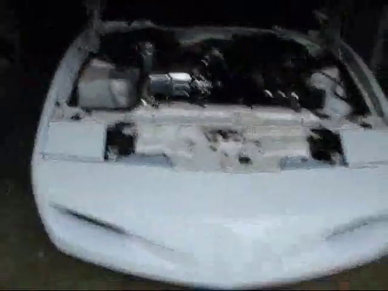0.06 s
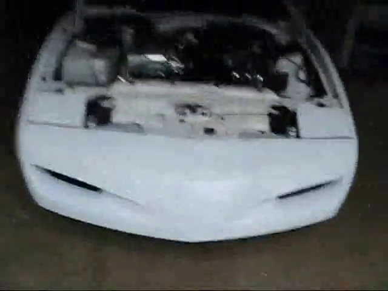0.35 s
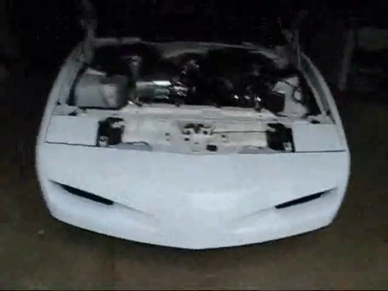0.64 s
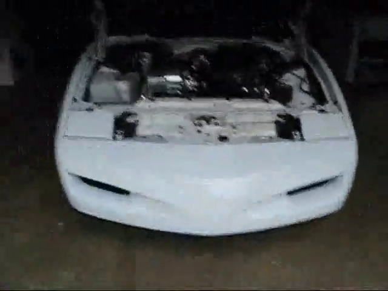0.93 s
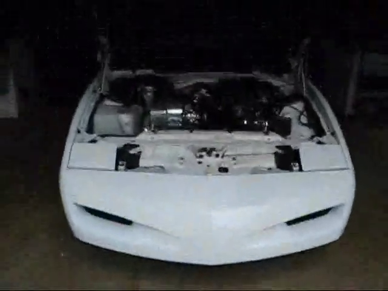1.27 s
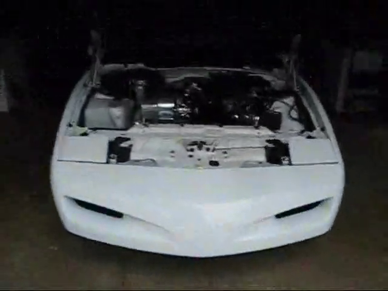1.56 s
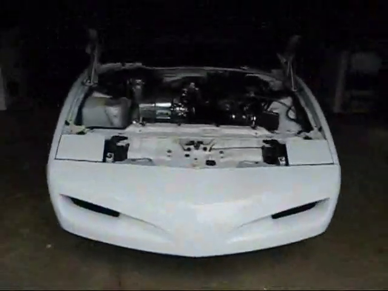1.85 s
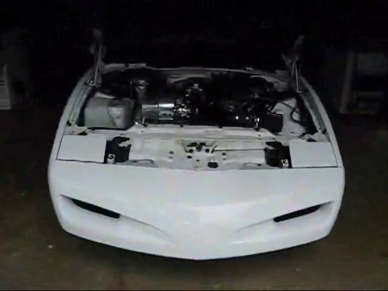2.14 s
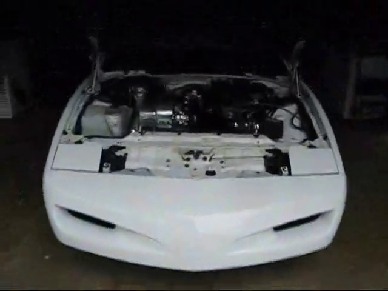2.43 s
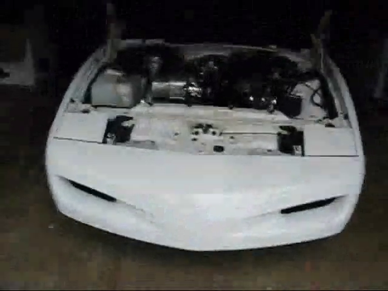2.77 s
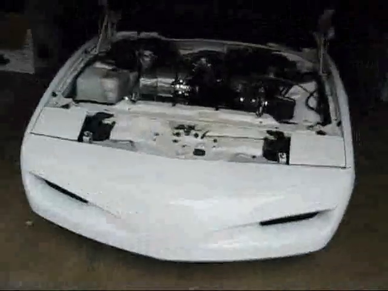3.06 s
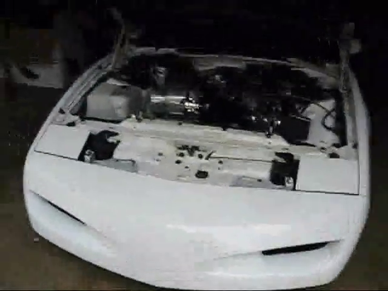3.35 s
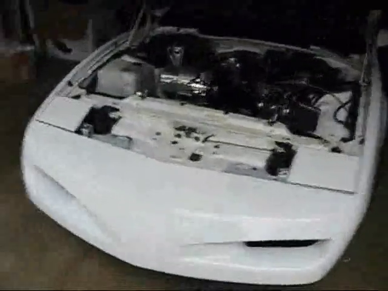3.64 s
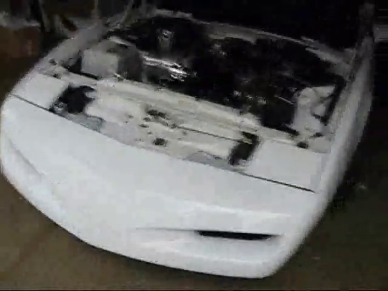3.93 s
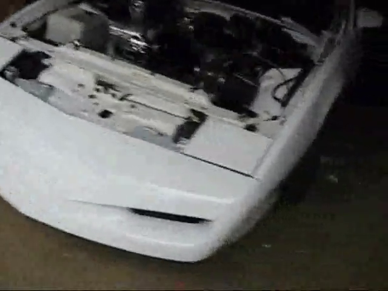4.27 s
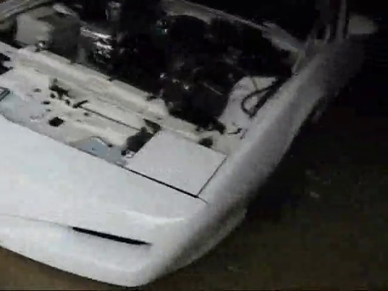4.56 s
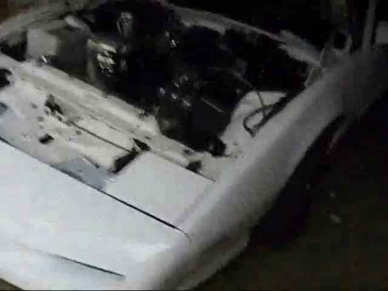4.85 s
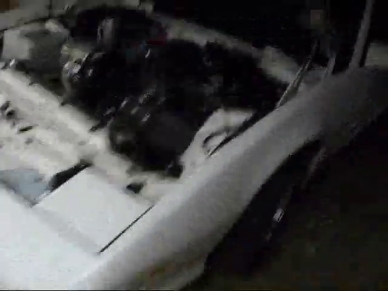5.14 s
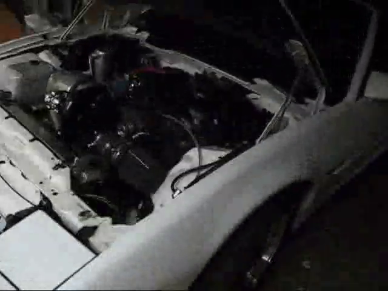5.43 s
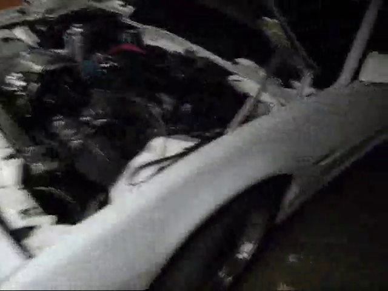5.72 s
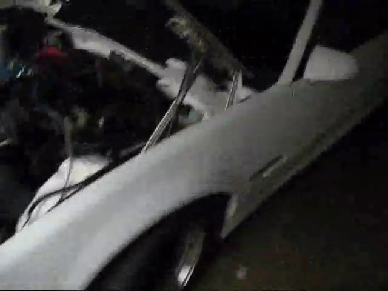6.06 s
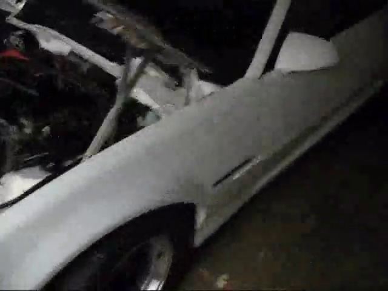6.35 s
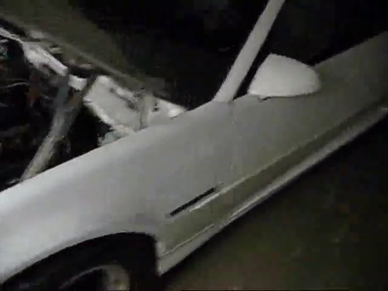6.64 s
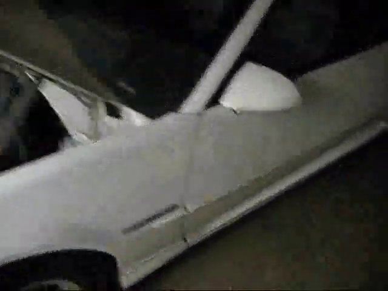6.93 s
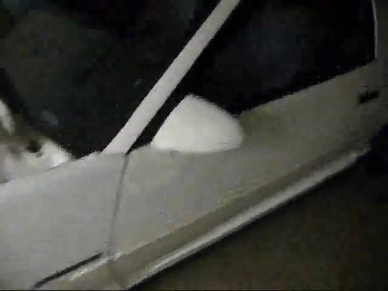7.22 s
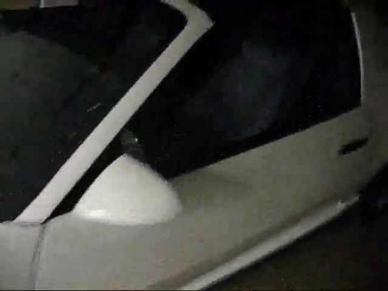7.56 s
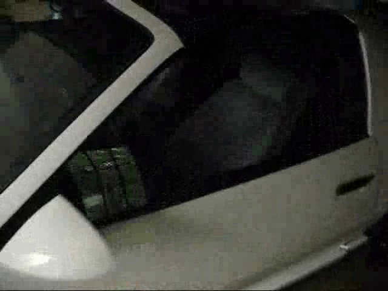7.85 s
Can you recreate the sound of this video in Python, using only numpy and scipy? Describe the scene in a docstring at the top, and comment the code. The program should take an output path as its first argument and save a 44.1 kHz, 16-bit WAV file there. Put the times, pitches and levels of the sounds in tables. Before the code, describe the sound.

A six-cylinder car engine idles in a garage with its hood open. A deep, loping exhaust drone dominates, with lighter valve clatter, buzzing metal covers and belt hiss above it. The microphone moves from the nose along the side. Past the middle the intake honks faintly, the idle stumbles and sags for a moment, and the boom softens as the engine carries on. A thin, faint whine runs throughout.

```python
"""A turbo V6 idles at about 950 rpm in a garage, bonnet open. At first the listener stands at the nose:
the exhaust drones on multiples of the bank firing rate and lopes with its uneven cylinders, valve gear
clatters, belts and air hiss. After a second the listener walks through the drone's standing waves, past
the honking intake near 5.5 s. The idle stumbles, sags and stumbles again; past the wheel, near 6 s, the
body shades the boom, and the walk ends by the driver's door at 8 s. Throughout, a coarse
sample-and-hold mirrors the drone into a thin whine."""
import sys
import numpy as np
from scipy import signal
from scipy.fft import rfft, irfft, next_fast_len
from scipy.io import wavfile

SR = 44100
rng = np.random.default_rng(int(sys.argv[2]) if len(sys.argv) > 2 else 0)


def pcm_store(signal):
    """Save signal as 16-bit PCM."""
    levels = np.round(np.clip(np.atleast_2d(signal), -1, 1) * 32767)
    wavfile.write(sys.argv[1], SR, levels.astype(np.int16).T)


N = 356769

# the listener's walk from the nose to the door: (time [s], distance [m])
WALK_PATH = [(0, 0), (1, 0), (3, 0.84), (4.4, 0.73), (5.4, 1.58), (6.2, 2.03), (7.2, 2.46), (8.09, 3)]
# how openly the engine bay is heard along the walk: (time [s], level [dB])
BAY_OPENNESS = [(0.1, -38), (4.48, -39.5), (5.19, -36), (6.74, -42.5), (7.27, -38), (7.83, -33.5),
                (8.05, -36)]
# engine noise leaving through the wheel arch: (frequency [Hz], relative density [dB])
ARCH_SPECTRUM = [(400, -15), (620, -0.5), (780, -11), (950, -14), (1200, -8.5), (2000, -10), (2700, -20)]
# belts and intake air: (frequency [Hz], relative density [dB])
HISS_SPECTRUM = [(25, -40), (500, -50), (1900, 1.5), (2400, 5.5), (2700, 3), (3200, 2.5), (4000, -0.5),
                 (4800, -2), (5500, -9.5)]
# ring of the block: (frequency [Hz], relative density [dB])
BLOCK_SPECTRUM = [(300, -32), (470, -1.5), (570, -3.5), (680, -1.5), (860, -2.5), (1000, -6.5), (1120, -25),
                  (1500, -22)]
# louder valve taps: (onset [cycles], relative height [ratio])
VALVE_TAPS = [(0.089, 0.15), (.2, 0.57), (.33, 0.17), (.45, 0.32), (0.648, 0.37), (0.781, 0.5), (.86, .5)]
# modes of thin metal shields and covers: (frequency [Hz], bandwidth [Hz], relative level [dB])
SHIELD_MODES = [(1090, 180, -2.5), (1218, 93, -2.5), (1335, 95, -1), (1438, 97, 1), (1567, 120, -1.5),
                (1697, 230, -4)]
# brief rasps of the shields: (time [s], frequency [Hz], level [dB], half length [s])
SHIELD_RASPS = [(1.088, 1240, -42, .03), (4.233, 1390, -37, .016), (5.623, 1523, -40, .03),
                (7.499, 1400, -43, 0.045), (7.589, 1432, -36, 0.031), (7.815, 1466, -37, 0.042)]
# engine speed: (time [s], firing rate of one bank [Hz])
BANK_RATE = [(0.0, 23.7), (0.97, 24.2), (1.51, 23.9), (2.91, 24.2), (3.24, 24.2), (3.47, 23.7),
             (4.19, 23.7), (4.84, 23.4), (5.36, 23.5), (5.63, 23), (5.81, 22.9), (6.15, 23.9), (6.31, 23.4),
             (6.71, 24), (6.85, 23.3), (7.48, 24.1), (7.91, 23.3), (8.09, 23.6)]
# stumbles into and out of the sag: (time [s], burble gain [dB])
IDLE_STUMBLES = [(5.55, 3), (6.15, 5.5)]
# exhaust pipe modes: (frequency [Hz], bandwidth [Hz], relative gain at nose [dB], at door [dB])
PIPE_MODES = [(69.8, 8.1, -6, -2), (115, 21, -3, -2.5), (167.2, 24.3, -6.5, 2), (213, 39.4, -3, -4.5),
              (251, 50, -6, -4.5), (342, 63, -10.5, -11), (419.4, 48, -11, -8)]
# harmonics at which the intake honks: (order [per four-stroke cycle])
HONK_HARMONICS = (39, 45, 51)
# weak exhaust harmonics; unequal cylinders give those not divisible by 3: (order [per cycle])
LOPE_HARMONICS = (6, 14, 18, 19, 22, 23, 24, 26, 28, 33, 35, 39, 41, 42, 46, 48, 51, 57)
# one row per weak harmonic: (level at nose [dB], level at door [dB])
LOPE_LEVELS = [(-43.5, -48), (-43, -37.5), (-48, -36), (-42, -41.5), (-56, -38), (-34.5, -39), (-34.5, -35),
               (-35.5, -43.5), (-35.5, -43), (-60, -45), (-38.5, -41), (-46, -40), (-55, -45),
               (-48.5, -47.5), (-47, -44), (-52, -49), (-52, -42), (-56, -42.5)]
# strong exhaust harmonics besides the boom: (order [per cycle])
DRONE_HARMONICS = (9, 21, 27, 30, 36, 45)
# their standing waves with the walls, one row each: (direct level at nose [dB], at door [dB],
# node position [m], node spacing [m], reflected share [ratio], gain while labouring [dB])
DRONE_WAVES = [(-25.5, -21.5, 1.43, 7.8, 0.74, 0), (-27.4, -23, .38, 1.26, 0.37, -3),
               (-28.5, -32.5, 1.3, 3.64, 0.67, -14), (-38, -33, 1.126, 1.3, 0.61, 4),
               (-38.5, -35.5, 0.75, 0.786, .4, 7.5), (-45, -45.5, 0.28, .86, 0.74, 12.5)]

LABOUR_S, LABOUR_HALF_S, STUMBLE_HALF_S = 5.83, .2, 0.1
BOOM_ORDER, BOOM_DB, BOOM_DB_PER_M = 15, -16.5, 1.47   # the main boom grows from nose to wheel
WHEEL_M, WHEEL_EDGE_M, BOOM_SHADED_DB = 1.862, 0.033, -19   # past the wheel the body shades it


def from_db(db):
    """Amplitude ratio of a level in decibels."""
    return 10 ** (np.asarray(db) / 20)


def rms_one(x):
    """Normalisation to unit rms."""
    return x / np.sqrt(np.mean(x ** 2) + 1e-20)


def in_time(rows):
    """Linear interpolation of a (time, value) table at every sample."""
    return np.interp(np.arange(N) / SR, *np.transpose(rows))


def bump(x, centre, half):
    """Gaussian curve of height 1."""
    return np.exp(-((x - centre) / half) ** 2)


def drift(rate_hz):
    """Low-passed noise: a slow random fluctuation of unit spread."""
    step, settling = 100, 1000
    pole = np.exp(-2 * np.pi * step * rate_hz / SR)
    noise = rng.standard_normal(N // step + settling + 2)
    slow = signal.lfilter([1], [1, -2 * pole, pole * pole], noise)[settling:]
    return np.interp(np.arange(N) / step, np.arange(len(slow)), rms_one(slow))


def colour(x, spectrum):
    """Spectral shaping of a flat signal, at unit rms."""
    size = next_fast_len(N)
    hz, db = np.transpose(spectrum)
    bin_hz = np.maximum(np.arange(size // 2 + 1) * SR / size, 1)
    gain_db = np.interp(np.log(bin_hz), np.log(hz), db, left=-60)
    return rms_one(irfft(rfft(x, size) * from_db(gain_db), size)[:N])


def resonance(x, hz, width_hz):
    """Damped two-pole resonator with unit peak gain."""
    r = np.exp(-np.pi * width_hz / SR)
    feedback = [1, -2 * r * np.cos(2 * np.pi * hz / SR), r * r]
    return signal.lfilter(np.array([1, 0, -1]) * (1 - r * r) / 2, feedback, x)


def narrow_buzz(hz, width_hz):
    """Random excitation of one mode gives narrow-band noise, at unit rms."""
    return rms_one(resonance(resonance(rng.standard_normal(N), hz, width_hz), hz, width_hz))


def walk():
    """Listener position in metres, and as a share of the way from nose (0) to door (1)."""
    metres = in_time(WALK_PATH)
    return metres, np.clip(metres / metres[-1], 0, 1)


def openness_db():
    """Transmission from the bay to the listener, relative to its median."""
    db = in_time(BAY_OPENNESS)
    return db - np.median(db)


def labour():
    """Engine load: 0 at free idle, 1 at the bottom of the sag."""
    return bump(np.arange(N) / SR, LABOUR_S, LABOUR_HALF_S)


def unrest_db(follows=0.98, labour_db=-6):
    """Irregular combustion comes through with the bay, flares in the stumbles and calms under load."""
    stumbles_db = sum(db * bump(np.arange(N) / SR, s, STUMBLE_HALF_S) for s, db in IDLE_STUMBLES)
    return follows * openness_db() + stumbles_db + labour_db * labour()


def standing_wave_db(metres, node_m, spacing_m, reflected):
    """Interference: a wave and its reflection partly cancel at the nodes and add between them."""
    return 20 * np.log10(abs(1 - reflected * np.exp(2j * np.pi * (metres - node_m) / spacing_m)))


def garage(x, wet, spots=6, t60_s=0.25):
    """Reverberation: wall reflections ripple the spectrum differently at each spot; unit rms."""
    age = np.arange(SR // 3) / SR
    spot = np.linspace(0, spots - 1, N)
    out = x.copy()
    for k in range(spots):
        echoes = rng.standard_normal(len(age)) * from_db(-60 * age / t60_s)
        crossfade = np.sqrt(np.maximum(1 - abs(spot - k), 0))
        out += wet * crossfade * signal.oaconvolve(x, echoes / np.linalg.norm(echoes))[:N]
    return rms_one(out)


def rumble(level_db=-51.0, stir=0.69):
    """Low-frequency motion of the garage air, stronger when the engine burbles."""
    air = colour(rng.standard_normal(N), [(8, -4), (24, 2), (34, -3), (50, -5), (90, -9), (200, -24)])
    return from_db(level_db + stir * unrest_db()) * air


def bay_hollow(level_db=-50.5, hz=725, width_hz=130, restless_db=3.0, spot_db=5):
    """Cavity resonance: the air in the open bay hums, most strongly towards one spot."""
    metres, _ = walk()
    focus_db = spot_db * bump(metres, centre=0.89, half=0.11)
    db = level_db + openness_db() + focus_db + restless_db * drift(6.3)
    return from_db(db) * narrow_buzz(hz, width_hz)


def wheel_arch(level_db=-45, follows=.7, opens_m=1.4, opening_m=.4):
    """Radiation through an opening: from the wheel on, a rush under the car flares with the burble."""
    metres, _ = walk()
    in_view = .5 + .5 * np.tanh((metres - opens_m) / opening_m)
    rush = colour(garage(rng.standard_normal(N), wet=0.62), ARCH_SPECTRUM)
    return in_view * from_db(level_db + follows * unrest_db()) * rush


def valve_taps(cycles, decay_cycles=0.023, uneven_db=12.0):
    """Impact envelopes: decaying taps recur with the camshaft, at a new strength on every turn."""
    envelope = np.zeros(N)
    for onset, height in VALVE_TAPS:
        turn, since = np.divmod(cycles - onset + 2, 1)
        strength = from_db(uneven_db * rng.uniform(-1, 1, N // 1000))
        envelope += height * strength[turn.astype(int)] * np.exp(-since / decay_cycles)
    return envelope


def belt_and_air_hiss(taps, level_db=-44.5, follows=0.39, door_db=-1.5, intake_db=1.6, tap_depth=0.87):
    """Broadband noise of belts and air, modulated by the taps and lifted beside the intake."""
    metres, to_door = walk()
    nearby_db = intake_db * bump(metres, centre=1.36, half=0.23)
    hiss = colour(garage(rng.standard_normal(N), wet=0.33) * (1 + tap_depth * taps), HISS_SPECTRUM)
    return from_db(level_db + follows * openness_db() + door_db * to_door + nearby_db) * hiss


def shield_chatter(cycles, taps, level_db=-44.5, follows=0.74, tap_depth=.55,
                   rock_db=1.0, restless_db=2.0, swell_db=0.76):
    """Forced vibration: thin shields buzz as the engine rocks once a cycle, and now and then rasp."""
    t = np.arange(N) / SR
    modes = sum(from_db(db + restless_db * drift(8)) * narrow_buzz(hz, width)
                for hz, width, db in SHIELD_MODES)
    rasps = sum(from_db(db) * bump(t, s, half) * narrow_buzz(hz, width_hz=300)
                for s, hz, db, half in SHIELD_RASPS)
    rocking_db = rock_db * np.cos(2 * np.pi * (cycles - .9))
    buzz_db = level_db + follows * openness_db() + rocking_db + swell_db * drift(2.8)
    return (from_db(buzz_db) * rms_one(modes) + rasps) * rms_one(1 + tap_depth * taps)


def valve_clatter(cycles, taps, level_db=-40.5, follows=0.74, door_db=0.5, tap_depth=0.66, alike=0.11):
    """Structure-borne sound: many small contacts ring the block, a share of them alike in every cycle."""
    _, to_door = walk()
    points = 4096
    recurring = np.interp(cycles % 1 * points, np.arange(points), rng.standard_normal(points))
    contacts = np.sqrt(alike) * rms_one(recurring) + np.sqrt(1 - alike) * rng.standard_normal(N)
    clatter = colour(garage(contacts, wet=0.77) * (1 + tap_depth * taps), BLOCK_SPECTRUM)
    return from_db(level_db + follows * openness_db() + door_db * to_door) * clatter


def engine_bay(cycles):
    """Common modulation: the same valve taps pulse the block, the shields and the hiss."""
    taps = valve_taps(cycles)
    return valve_clatter(cycles, taps) + shield_chatter(cycles, taps) + belt_and_air_hiss(taps)


def harmonic(cycles, order, level_db, waver_db, lead=0):
    """One Fourier component of the engine cycle, wavering in level; lead in radians."""
    amplitude = np.sqrt(2) * from_db(level_db + waver_db * drift(2.6))
    return amplitude * np.sin(2 * np.pi * order * cycles + lead)


def intake_honk(cycles, tone_db=-42, gulp_db=-37, spot_m=1.64, spot_half_m=0.5):
    """Pulsating inflow: the intake honks with its gulps of air, heard only from close by."""
    metres, _ = walk()
    tones = sum(harmonic(cycles, order, tone_db, waver_db=2) for order in HONK_HARMONICS)
    gulps = from_db(gulp_db) * narrow_buzz(hz=375, width_hz=110)
    return bump(metres, spot_m, spot_half_m) * (tones + gulps)


def burble(cycles, level_db=-31, turbulence=1.36, muffler_hz=(55, 400)):
    """Pipe resonance: each firing excites the modes with a random kick and a puff of turbulence."""
    metres, to_door = walk()
    firings = 6 * cycles
    fired = np.diff(np.floor(firings), prepend=0) > 0
    kicks = rms_one(fired * rng.standard_normal(N))
    puffs = rms_one(np.exp(-(firings % 1)) * rng.standard_normal(N))
    drive = kicks + turbulence * puffs
    pipe = sum((-1) ** k * from_db(nose_db + (door_db - nose_db) * to_door) * resonance(drive, hz, width)
               for k, (hz, width, nose_db, door_db) in enumerate(PIPE_MODES))
    muffler = signal.butter(2, muffler_hz, "band", fs=SR, output="sos")
    db = level_db + unrest_db() + standing_wave_db(metres, node_m=1.0, spacing_m=3.7, reflected=0.23)
    return from_db(db) * rms_one(signal.sosfilt(muffler, pipe))


def exhaust(cycles, boom_lag_rad=0.83, dispersion_rad=0.281, drone_waver_db=0.66, lope_waver_db=2.5):
    """Harmonics in step sum to the alternating puffs of the two banks; weaker ones make the idle lope."""
    metres, to_door = walk()
    load = labour()
    shaded = .5 + .5 * np.tanh((metres - WHEEL_M) / (2 * WHEEL_EDGE_M))
    boom_db = (1 - shaded) * (BOOM_DB + BOOM_DB_PER_M * metres) + shaded * BOOM_SHADED_DB
    out = harmonic(cycles, BOOM_ORDER, boom_db, drone_waver_db)
    # up to the wheel the garage's boom trails the puffs and fills the gaps between them
    lead = boom_lag_rad * (1 - shaded)
    for order, wave in zip(DRONE_HARMONICS, DRONE_WAVES):
        nose_db, door_db, node_m, spacing_m, reflected, labour_db = wave
        direct_db = nose_db + (door_db - nose_db) * to_door + labour_db * load
        db = direct_db + standing_wave_db(metres, node_m, spacing_m, reflected)
        smear = dispersion_rad * ((order - BOOM_ORDER) / 6) ** 2   # the long pipe smears the puffs
        out += harmonic(cycles, order, db, drone_waver_db, lead + smear)
    for order, (nose_db, door_db) in zip(LOPE_HARMONICS, LOPE_LEVELS):
        db = nose_db + (door_db - nose_db) * to_door
        out += harmonic(cycles, order, db, lope_waver_db, lead=rng.uniform(0, 2 * np.pi))
    return out


def scene(hunt=.004, start_cycle=.018):
    """Superposition around one crankshaft: each bank fires three times in a cycle of two turns."""
    bank_hz = in_time(BANK_RATE) * (1 + hunt * drift(rate_hz=4))   # the idle hunts at random
    cycles = start_cycle + np.cumsum(bank_hz / 3) / SR
    breathing = exhaust(cycles) + burble(cycles) + intake_honk(cycles)
    return (breathing + wheel_arch() + rumble() + engine_bay(cycles) + bay_hollow())[None]


def record(dry, ceiling=0.55, sample_hz=11025, cutoff_hz=15800):
    """Saturation rounds the peaks; a zero-order hold mirrors the spectrum about its sample rate."""
    rounded = dry / (1 + (dry / ceiling) ** 8) ** (1 / 8)
    narrow = signal.sosfilt(signal.cheby1(10, .2, sample_hz / 2, fs=SR, output="sos"), rounded)
    n, hold = np.arange(N), round(SR / sample_hz)
    slip = n // (SR // 4)   # the sample clock slips four times a second, so the whine flutters
    held = narrow[:, np.maximum(n - (n + slip) % hold, 0)]
    return signal.sosfilt(signal.ellip(12, .1, 90, cutoff_hz, fs=SR, output="sos"), held)


dry = scene()
out = record(dry)
pcm_store(out)
```